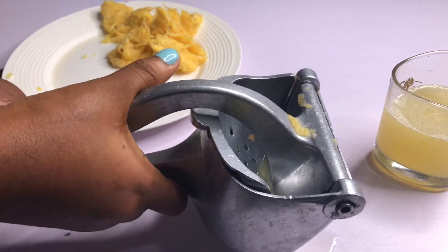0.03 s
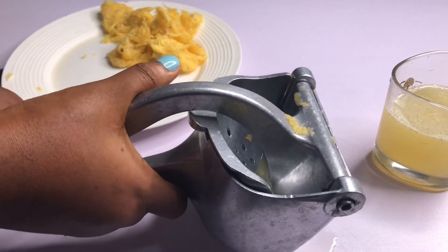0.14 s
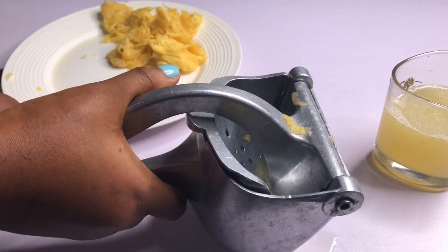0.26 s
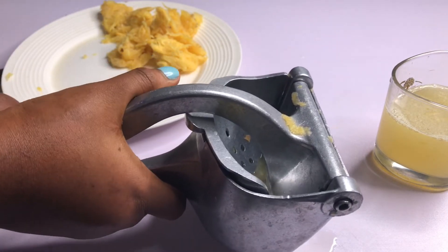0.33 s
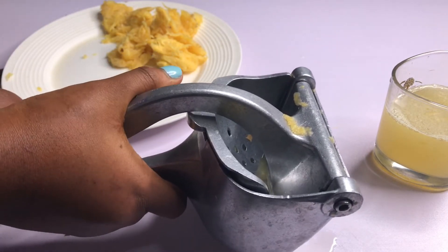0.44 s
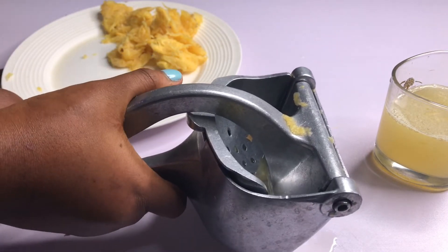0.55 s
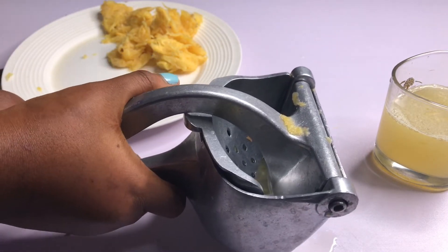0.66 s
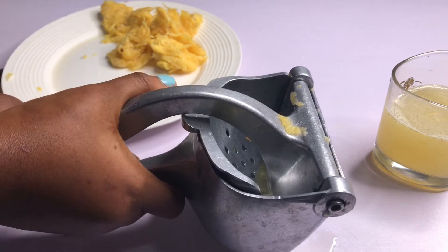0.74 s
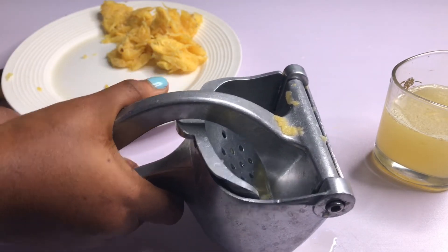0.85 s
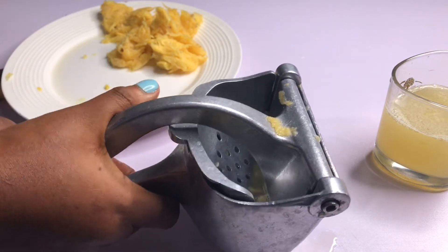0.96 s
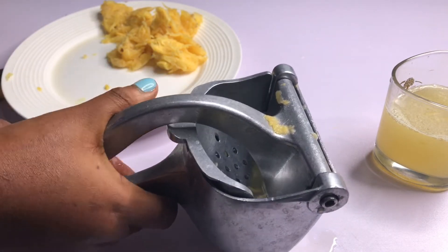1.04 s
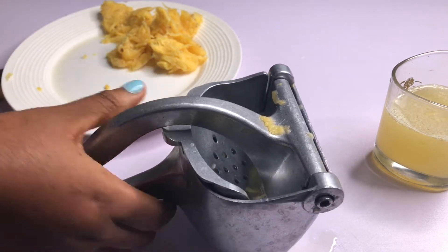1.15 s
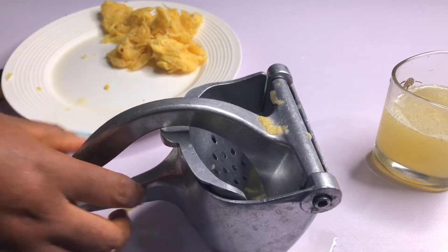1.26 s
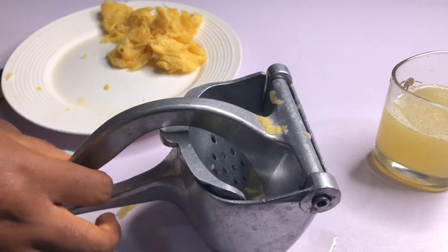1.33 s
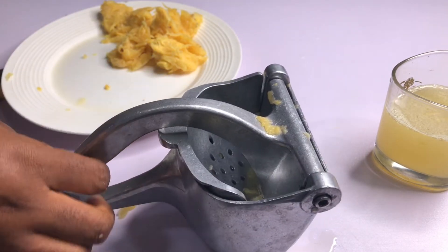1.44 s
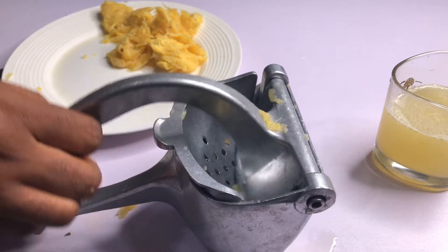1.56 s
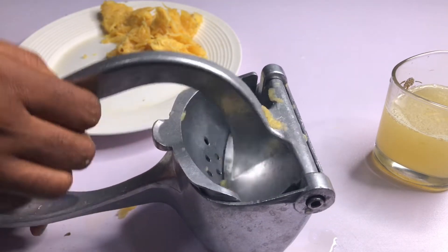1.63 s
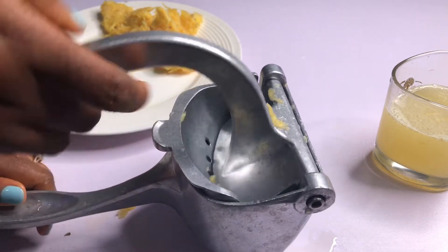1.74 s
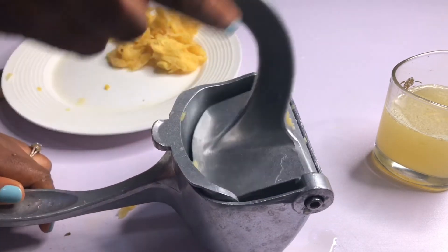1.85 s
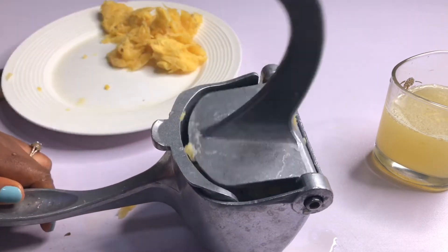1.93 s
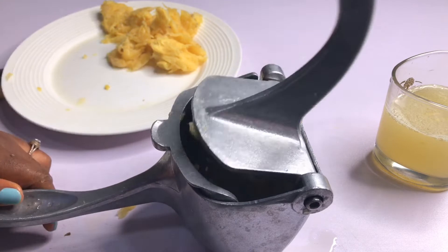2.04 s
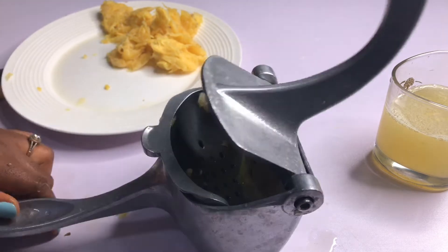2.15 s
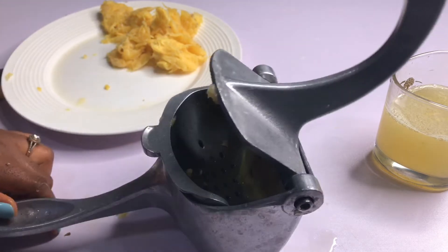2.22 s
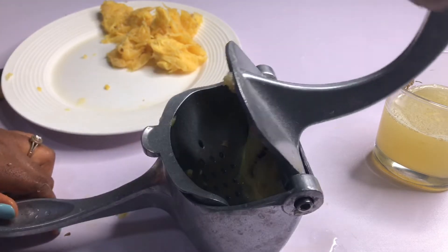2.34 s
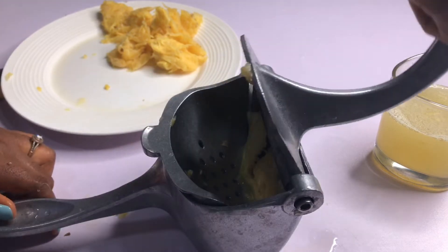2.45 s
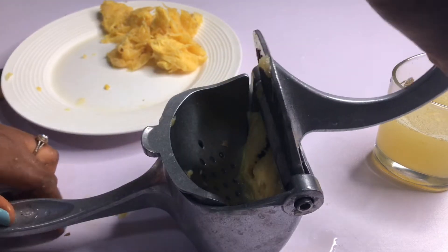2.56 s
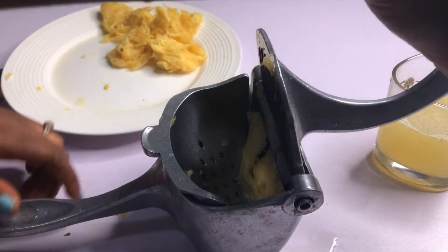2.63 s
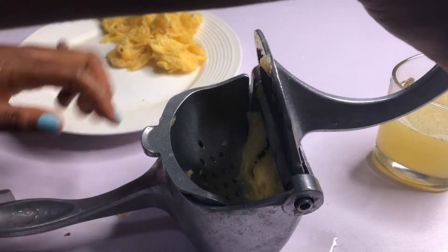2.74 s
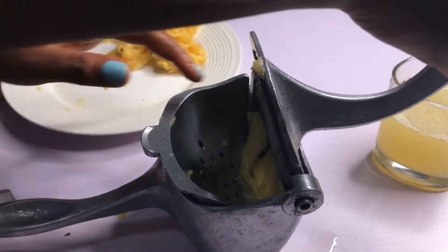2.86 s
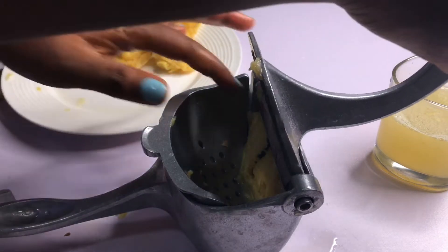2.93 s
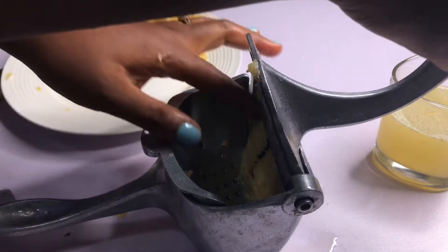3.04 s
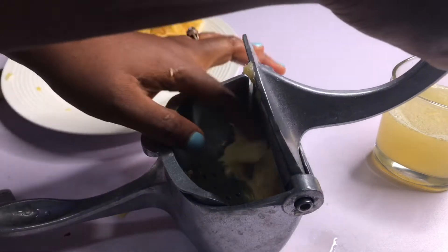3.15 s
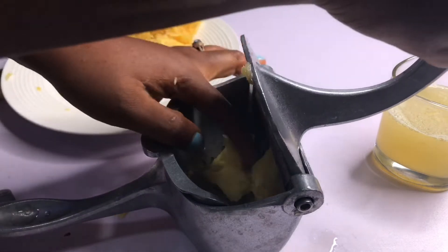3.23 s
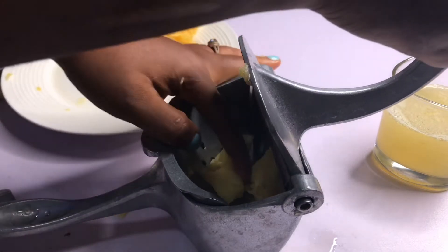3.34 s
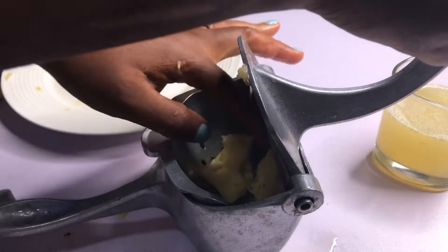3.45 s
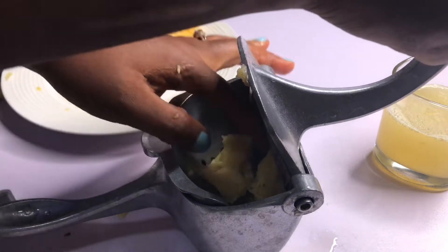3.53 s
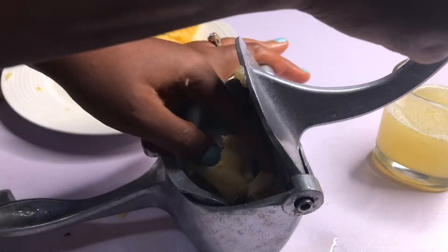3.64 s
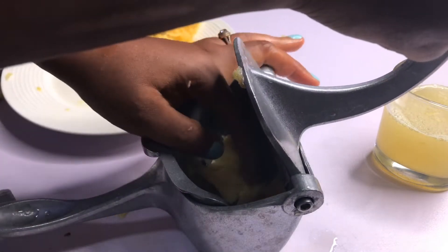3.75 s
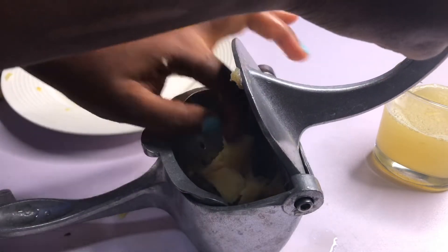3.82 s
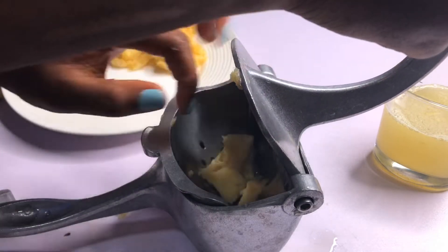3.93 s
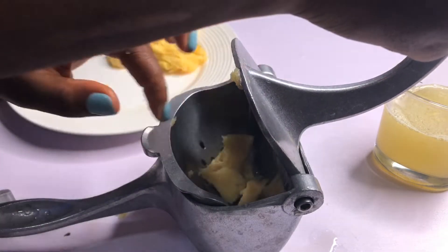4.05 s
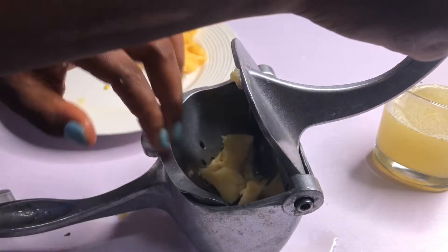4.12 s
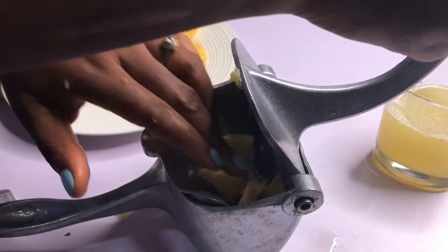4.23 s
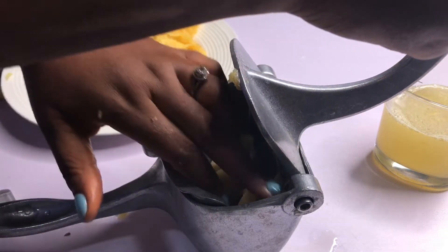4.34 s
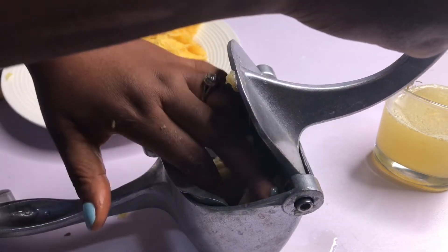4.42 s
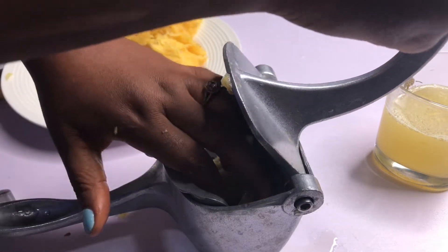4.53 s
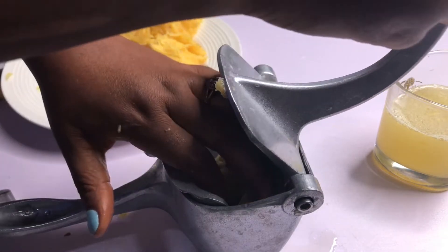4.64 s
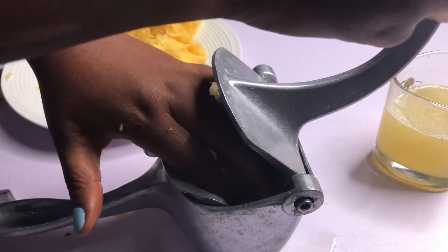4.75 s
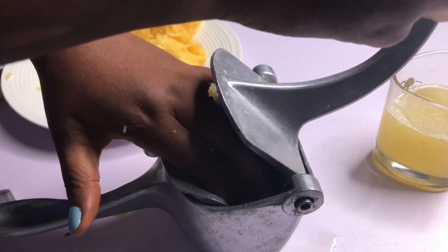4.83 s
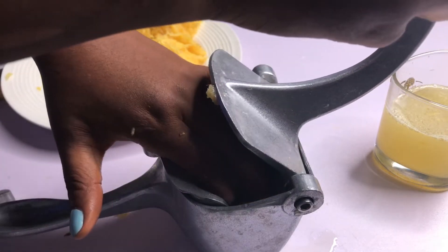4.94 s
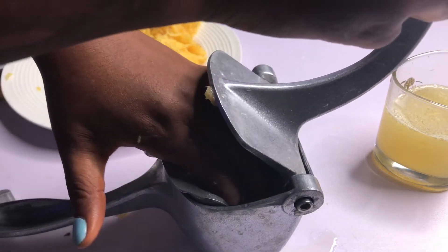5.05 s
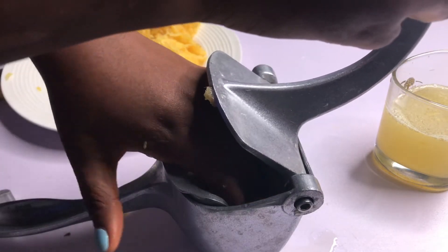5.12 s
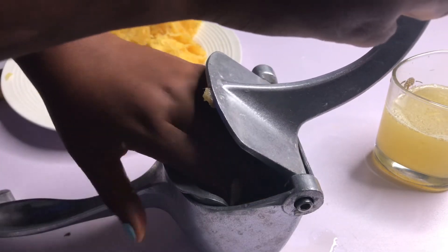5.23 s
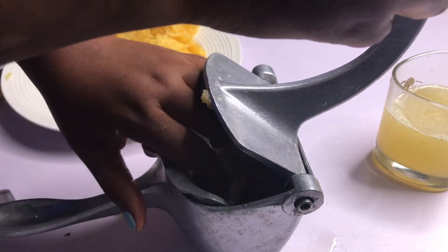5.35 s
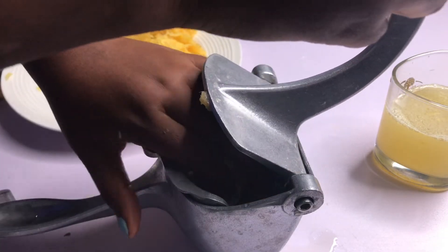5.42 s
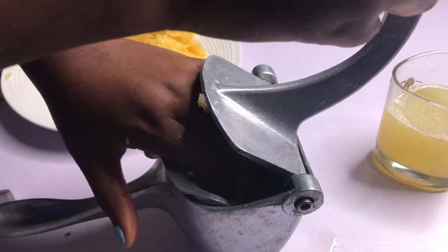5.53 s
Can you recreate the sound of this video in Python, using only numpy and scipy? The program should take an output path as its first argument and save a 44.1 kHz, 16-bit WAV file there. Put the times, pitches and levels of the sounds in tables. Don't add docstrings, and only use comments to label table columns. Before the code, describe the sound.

A cast-metal hand juicer thuds onto a table, its lever rattles loose and slams open, then fingers pop wet pulp and clink the strainer.

```python
import sys
import numpy as np
from scipy import signal
from scipy.fft import rfft, irfft
from scipy.io import wavfile
from scipy.ndimage import uniform_filter1d

SR = 44100
rng = np.random.default_rng(int(sys.argv[2]) if len(sys.argv) > 2 else 0)


def inscribe(sig):
    pcm = np.round(np.clip(np.atleast_2d(sig).T, -1, 1) * 32767)
    wavfile.write(sys.argv[1], SR, pcm.astype(np.int16))


def decibels_to_gain(level_db):
    exponent = np.asarray(level_db, float) / 20
    return 10 ** exponent


N = 246078
T = np.arange(N) / SR
SIZE = 16384
HZ = np.arange(SIZE // 2 + 1) * SR / SIZE
HELD, LEANED = 1.1, 1.6


# start_s, level_db, weight_db (extra bass), hardness_db (extra treble)
KNOCKS = [
    (1.0396, -15.5, -4.5, -17.5),
    (2.803, -56.5, 2, -52),
    (3.117, -45.5, -34, -15),
    (3.807, -55, 2.5, -41),
    (3.916, -56, 8, -8),
    (3.945, -47, 0.5, -11.5),
    (4.311, -42.5, 1, -14.5),
    (4.368, -54, 4.5, -15),
    (5.436, -50, 2, -18),
]
# pitch_hz, width_hz, level_db
TABLE_MODES = [(96.57, 36, 2), (419, 25, -9), (594, 19, -1), (712, 14, -4), (897, 24, -12), (1214, 9.4, -7),
               (1413, 11, -11), (1700, 15, -23.5), (2010, 19, -21.5), (2460, 15, -37), (2610, 21, -26),
               (2810, 26, -30.5), (3080, 31, -19), (3800, 23, -28)]
# pitch_hz, width_hz, level_db
FOOT_MODES = [(124, 64, 0), (624, 29, -8), (974, 35, -19), (1360, 87, -11), (1820, 46, -22),
              (2410, 34, -33), (2700, 34, -36), (3460, 24, -41), (4450, 53, -35), (5360, 41, -37)]


def set_down():
    table = ring(HZ, TABLE_MODES, LEANED, -8, 100, 1300)
    foot = ring(HZ, FOOT_MODES, LEANED, -15.5, 61.7, 860)
    landing = strike(blows(KNOCKS[:1], 3.2, -12.5), table, -2.1, even=0.67)
    return landing + strike(blows(KNOCKS[1:], 3.63, -5), foot, -0.46)


# start_s, level_db, weight_db, hardness_db
SLAMS = [
    (2.138, -7, -9, -1),
    (2.511, -44, -21, -8.5),
    (2.574, -55, -10, -8),
    (2.97, -38, -8, -1.5),
    (2.982, -57.5, 11, -18),
]
# pitch_hz, width_hz, level_db
BOWL_MODES = [(183, 15, 0), (296, 28, 0), (630, 31, -2), (845, 28, 0), (1500, 93, -6), (1850, 38, -2),
              (2130, 54, -11), (2370, 57, -8), (2830, 40, -8), (3490, 50, -14), (3740, 31, -14),
              (3990, 21, -13), (4110, 18, -13), (4420, 23, -17), (4580, 41, -16), (5360, 70, -3),
              (6020, 67, -17), (6760, 60, -12), (7550, 84, -18), (8070, 44, -22), (8340, 79, -23),
              (9340, 61, -25), (10800, 52, -30), (11900, 50, -28)]
# pitch_hz, width_hz, level_db
SEAT_MODES = [(624, 36, -14), (1780, 120, -24), (2480, 41, -16), (3050, 92, -18), (3850, 51, -22),
              (4440, 33, -16), (5380, 61, -22), (6200, 65, -24), (6795, 29, 0), (11600, 130, -32)]


def slam():
    bowl = ring(HZ, TABLE_MODES[:1] + BOWL_MODES, HELD, -0.5, 840, 3100)
    seat = ring(HZ, SEAT_MODES[:5], 1.43, -12, 574, 3000)
    hit = strike(blows(SLAMS[:1], 5.5, -12.5), bowl, -1.0, even=.6)
    return hit + strike(blows(SLAMS[1:], 4.1, -19), seat, 0.17)


# start_s, level_db, weight_db, hardness_db, contact_ms
LEVER = [(1.455, -57.5, 2.5, 3, 5), (1.472, -51, -6.5, 3, 5.4), (1.489, -43, -13.5, 2, 2.4),
         (1.495, -28, -23.5, -4.5, 2.7), (1.53, -32.5, -19.5, -9.5, 7.6), (1.54, -30, -11, -15.5, 2.2),
         (1.581, -29.5, -20, -13.5, 5.3), (1.587, -29.5, -12, -5, 1.1), (1.644, -33.5, -7.5, -8, 5.7),
         (1.711, -40, -9, -9, 3.7), (1.718, -33.5, -23.5, -1, 3.7), (1.724, -32.5, -7.5, -9.5, 3.4),
         (1.767, -39.5, -15.5, -7.5, 2.3), (1.837, -46, -2.5, -16, 3.6)]
# pitch_hz, width_hz, level_db
HINGE_MODES = [(940, 150, -2.5), (1327, 88, -0.5), (1950, 130, -3), (2270, 67, -8.5), (2850, 130, -9.5),
               (3455, 110, -7.5), (4060, 54, -19), (3940, 37, -15), (4320, 22, -21), (4430, 57, -20.5),
               (5220, 23, -22.5), (5700, 71, -19.5), (5970, 48, -23), (6460, 46, -21), (8300, 140, -28),
               (9270, 130, -29.5)]


def lever():
    knocks = []
    for *row, contact_ms in LEVER:
        knocks += blows([row], contact_ms, -13)
    body = ring(HZ, BOWL_MODES[:2] + HINGE_MODES, 1.8, -11, 900, 3500)
    return strike(knocks, body, 1.5, even=.35)


# start_s, level_db, weight_db, hardness_db
CLINKS = [
    (5.024, -70.5, -6, 14),
    (5.048, -47, -16, 10.5),
    (5.062, -55, -11, -13),
    (5.188, -65, -4.5, 24),
    (5.211, -60.5, 4, 30.5),
    (5.233, -37, -27, 4),
    (5.247, -50, -22, 11),
]
# start_s, level_db, weight_db, hardness_db
TOUCHES = [
    (1.03, -65.5, -16, 8),
    (2.093, -70.5, 2, 5),
    (2.113, -58.5, -14.5, -0.5),
    (2.126, -49.5, 5, -1),
]
# start_s, level_db, weight_db, hardness_db
RIM_CLINKS = [
    (5.314, -47.5, -3, 1),
    (5.354, -51.5, -15, -2.5),
    (5.473, -42, -6, 6.5),
    (5.496, -49.5, -4.5, -16),
    (5.504, -54.5, 5, 15.5),
]
# start_s, level_db, weight_db, hardness_db
FADING = [
    (.001, -57, 0, -6.5),
]
# pitch_hz, width_hz, level_db
STRAINER_MODES = [(940, 90, -13), (1340, 72, -14), (2510, 27, -11), (2670, 42, -18), (2980, 130, -15),
                  (3400, 240, -23), (4450, 36, -2), (5340, 52, -15.5), (6785, 31, 4.5), (9500, 58, -47),
                  (10330, 57, -39), (11800, 92, -34)]
# pitch_hz, width_hz, level_db
RIM_MODES = [(804, 43, -2.5), (1375, 54, -9), (1814, 20.4, -12), (2390, 38, -16.5), (3000, 140, -18),
             (3560, 57, -16), (4040, 72, -16), (4400, 110, -11.5), (5370, 35, -5.5), (6410, 170, -13.5),
             (6860, 99, -10.5), (10800, 87, -31)]
# pitch_hz, width_hz, level_db
PLATE_MODES = [(1880, 120, 0), (2080, 80, -3), (3350, 150, -4)]


def clinks():
    hinge = ring(HZ, HINGE_MODES, 0.68, -12, 890, 3500)
    plate = ring(HZ, PLATE_MODES, 0.77, -23.0, 200, 3600)
    seat = ring(HZ, SEAT_MODES, 1.0, -23.0, 770, 3600)
    strainer = ring(HZ, STRAINER_MODES, 1.0, -47, 410, 2700)
    rim = ring(HZ, RIM_MODES, 1.0, -23.5, 640, 3700)
    light_touches = blows(TOUCHES, 5.9, -14.5) + blows(CLINKS[:1], 2.3, -23)
    return (strike(light_touches, hinge, 0.18)
            + strike(blows(FADING, 32, -23), plate, 0.36)
            + strike(blows(CLINKS[1:3], 2.0, -9), seat, -0.92)
            + strike(blows(CLINKS[3:], 2.14, -31), strainer, -5.0)
            + strike(blows(RIM_CLINKS, 2.13, -14), rim, -3.7))


# start_s, length_s, level_db
DRAG = [
    (5.075, .003, -62),
    (5.189, 0.0493, -34.5),
    (5.465, 0.017, -44),
]


def drag():
    grip_db_per_s, slip_db_per_s = 1700, 1196
    clicks = (rng.random(N) < 1100 / SR) * rng.standard_normal(N)
    clicks = unit_clicks = clicks * decibels_to_gain(3.2 * rng.exponential(size=N))
    out = np.zeros(N)
    for (start, length, db), modes in zip(DRAG, (SEAT_MODES, STRAINER_MODES, RIM_MODES)):
        body = irfft(ring(HZ, modes, 1.0, -45.0, 880, 2660), SIZE)
        before, after = np.maximum(start - T, 0), np.maximum(T - start - length, 0)
        gain = decibels_to_gain(db - 5.5 - grip_db_per_s * before - slip_db_per_s * after)
        out += signal.fftconvolve(unit(clicks) * gain, body / np.linalg.norm(body))[:N]
    return out


# start_s, level_db, pitch_octaves above 1 kHz, finger_thud_db
POPS = [(0.159, -52, 2.5, -39.5), (.198, -73, 3.5, -46), (0.226, -60, 2.1, -50), (0.253, -54.5, 3.4, -59),
        (0.322, -50.5, 2.74, -61), (.379, -57, 3.5, -51.5), (0.486, -50, 1.1, -59),
        (0.551, -50.5, 2.55, -71), (0.618, -57, 2.2, -65), (3.055, -51.5, 1.3, -68), (3.075, -49, 4.1, -70),
        (3.129, -57, 3.6, -63), (3.18, -50, 1.8, -48), (3.208, -37.5, 0.19, -45), (3.234, -41, 0.88, -40.5),
        (3.306, -56, 2.94, -53), (3.342, -61, 3.8, -64), (3.442, -33, 1.38, -62.5),
        (3.546, -45.5, 0.12, -48), (3.577, -36.5, 0.77, -44.5), (3.68, -56, 3.2, -76),
        (4.515, -52.5, 2.47, -49), (4.756, -49, 2.86, -71.5), (4.774, -54, 3.8, -69),
        (4.877, -53.5, 2, -50), (4.896, -57, 3.3, -73), (4.967, -52.5, 3.5, -62), (5.4495, -35, 3.5, -37),
        (5.547, -42.5, 2.65, -69.5)]


def pulp():
    fall_db_per_octave, pop_ms, relative_width = 8.5, 2.4, 0.51
    body = ring(HZ, HINGE_MODES, 0.72, -9.0, 780, 12000)
    range_octaves = np.log2(np.array(RANGES_HZ) / 1000)
    out = np.zeros(N)
    for start, db, octave, thud in POPS:
        levels = db - fall_db_per_octave * np.abs(range_octaves - octave)
        hz = 1000 * 2 ** octave
        cavity = ring(HZ, [(hz, relative_width * hz, 0)], 1, -3.5, 60, 16000)
        out += strike([(start, levels[0], thud, *levels[2:], pop_ms)], body * cavity, 0.12)
    return out


# start_s, effort_db, lightness_db (low when leaning on the table, high when fingertips brush)
HANDS = [(.1, -61.5, -5), (.23, -67, 4), (.4, -70.5, 1), (.63, -73, 2.5), (.86, -67.5, -6),
         (1.4, -65.5, -5), (1.9, -64.5, -9.5), (2.6, -68, -14.5), (2.77, -71.5, -8.5), (3.141, -60, -9),
         (3.3, -73, 1), (3.589, -61.5, -6.5), (3.8, -72, -1), (4.74, -73.5, -1.5), (5.09, -64.5, -1.5),
         (5.2, -63, -0.5), (5.4, -61.5, -6.5), (5.51, -60, -2)]


def hands():
    start, *controls = np.transpose(HANDS)
    effort, light = (np.interp(T, start, c) for c in controls)
    rumble = noise(55, 240, 2.5, 20)
    rub = noise(380, 2600, 3.5, 60)
    rustle = noise(1800, 7500, 4.2, 150)
    skin = irfft(ring(HZ, PLATE_MODES + [(5960, 320, -4.5)], 1.8, -31.5, 900, 6000), SIZE)
    rustle = rustle + 1.1 * unit(signal.fftconvolve(rustle, skin)[:N])
    return (decibels_to_gain(effort - light - 3.23) * rumble
            + decibels_to_gain(effort - 5.0 + .1 * light) * rub
            + decibels_to_gain(effort + light - 10.5) * rustle)


# start_s, length_s, start_hz, end_hz, level_db
WHISTLES = [
    (0.954, 0.044, 14000, 13600, -71),
    (1.995, 0.042, 14100, 13000, -72),
    (3.175, 0.035, 13540, 13300, -65.5),
    (3.72, 0.041, 14000, 13330, -70.5),
    (3.761, 0.094, 5220, 5260, -78),
    (4.663, 0.28, 9000, 9680, -81.5),
]


def whistles():
    flutter = 0.68 + 0.85 * noise(60, 400, 1.5, 40)
    out = np.zeros(N)
    for start, length, start_hz, end_hz, db in WHISTLES:
        u = np.clip((T - start) / length, 0, 1)
        glide_hz = start_hz + (end_hz - start_hz) * u
        out += decibels_to_gain(db) * np.sin(np.pi * u) * flutter * np.sin(2 * np.pi * np.cumsum(glide_hz) / SR)
    return out


# pitch_hz, level_db
HUM = [
    (236.9, -62.5),
    (285.3, -74.5),
    (328.4, -76.5),
    (710.6, -81.5),
]
# pitch_hz, level_db (per Hz)
AIR = [(15, -44.5), (26, -18.5), (70, -2), (186, -8), (237, -15), (286, -11.5), (465, -23.5), (716, -18.5),
       (2220, -34.5), (12800, -39.5), (15100, -39), (16300, -53)]


def kitchen():
    air_hz, air_db = np.transpose(AIR)
    f = np.fft.rfftfreq(N, 1 / SR) + 1
    colour = decibels_to_gain(np.interp(np.log(f), np.log(air_hz), air_db))
    air = unit(irfft(rfft(rng.standard_normal(N)) * colour, N))
    drift = unit(uniform_filter1d(rng.standard_normal(N), size=6000))
    hum = np.zeros(N)
    for hz, db in HUM:
        phase = 2 * np.pi * np.cumsum(hz + 1.4 * np.roll(drift, 9000)) / SR
        hum += decibels_to_gain(db + 4.0 + drift) * np.sin(phase)
    return decibels_to_gain(-62) * air + hum


# pitch_hz, fade_s (time to fall 60 dB), level_db
ROOM = [(97, 0.22, 8.5), (262, 0.26, 8), (730, .36, 3), (2010, 0.36, -3.5), (3300, .36, -3.5),
        (5400, 0.27, -6.5), (12900, 0.13, 1.5)]


def room(x, wet_db):
    t = T[:2 * SIZE]
    f = np.fft.rfftfreq(len(t), 1 / SR)
    tail = np.zeros(len(t))
    for hz, fade_s, db in ROOM:
        fade = decibels_to_gain(db - 60 * t / fade_s) + decibels_to_gain(db - 12.5 - 32 * t / fade_s)
        echoes = irfft(rfft(rng.standard_normal(len(t))) * band(f, hz / 2.34, hz * 2.29))
        tail += fade * np.sqrt(hz / fade_s) * unit(echoes)
    tail *= np.clip((t - .003) / 0.0077, 0, 1)
    tail *= 1 + 4.2 * np.exp(-t / 0.0073)
    return x + decibels_to_gain(wet_db) * signal.fftconvolve(x, tail / np.linalg.norm(tail))[:N]


def blows(rows, contact_ms, edge_db):
    return [(start, db, db + weight, db + hard, db + edge_db + 1.4 * hard, contact_ms)
            for start, db, weight, hard in rows]


RANGES_HZ = [1000, 150, 4200, 11000]


def strike(events, body, trim_db, even=.5):
    out, t = np.zeros(N + SIZE), np.arange(SIZE) / SR
    near = np.array([1 / (1 + (np.log((HZ + 1) / hz) / .5) ** 6) for hz in RANGES_HZ])
    ranges = near / near.sum(axis=0)
    fade_out = np.cos(np.pi / 2 * t / t[-1])
    for start, *dbs, contact_ms in events:
        contact = np.tanh(4000 * t / contact_ms) * np.exp(-1000 * t / np.clip(contact_ms, .3, 40))
        chatter = rfft(rng.standard_normal(SIZE) * contact)
        blow = body * chatter / causal(np.abs(chatter) ** even)
        power = uniform_filter1d(irfft(blow * ranges, SIZE) ** 2, size=256)
        loudest = np.sqrt(power.max(axis=1))
        colour = (decibels_to_gain(np.array(dbs) + trim_db) / loudest) @ ranges
        i = int(start * SR)
        out[i:i + SIZE] += irfft(blow * causal(colour), SIZE) * fade_out
    return out[:N]


def ring(hz, modes, damping, crack_db, low_hz, high_hz):
    out = decibels_to_gain(crack_db) / (1 + 1j * hz / high_hz) ** 2 / (1 - 1j * low_hz / (hz + 1)) ** 2
    for k, (f, width, db) in enumerate(modes):
        half = damping * width / 2
        mode = half * (1 / (half + 1j * (hz + f)) - 1 / (half + 1j * (hz - f)))
        out = out + (-1) ** k * 1j * decibels_to_gain(db) * mode
    return out / (1 - 1j * 72 / (hz + 1)) ** 4


def causal(gain):
    cepstrum = irfft(np.log(gain + 1e-9), SIZE)
    cepstrum[1:SIZE // 2] *= 2
    cepstrum[SIZE // 2 + 1:] = 0
    return np.exp(rfft(cepstrum))


def noise(lo_hz, hi_hz, flicker_db, rate):
    k = int(SR / rate)
    walk = uniform_filter1d(np.repeat(rng.standard_normal(N // k + 1), k), k)[:N]
    x = irfft(rfft(rng.standard_normal(N)) * band(np.fft.rfftfreq(N, 1 / SR), lo_hz, hi_hz), N)
    return unit(x * decibels_to_gain(flicker_db * walk))


def band(hz, lo_hz, hi_hz):
    return 1 / ((1 - 1j * lo_hz / (hz + 1e-9)) * (1 + 1j * hz / hi_hz)) ** 3


def unit(x):
    return x / np.sqrt(np.mean(x ** 2))


def scene():
    juicer = set_down() + slam() + lever() + clinks() + drag()
    pops = pulp()
    in_room = room(juicer + 0.162 * pops, -3.5)
    return (in_room + 0.184 * pops + hands() + whistles() + kitchen())[None]


def band_limit(x):
    return signal.sosfilt(signal.butter(12, 16490, fs=SR, output="sos"), x)


def record(dry):
    rounded = 1.25 * np.tanh(.85 * dry)
    no_bass = signal.sosfilt(signal.butter(2, 44, "high", fs=SR, output="sos"), rounded)
    mix = signal.sosfilt(signal.ellip(8, .2, 70, 16200, fs=SR, output="sos"), no_bass)
    return band_limit(mix)


dry = scene()
out = record(dry)
inscribe(out)
```